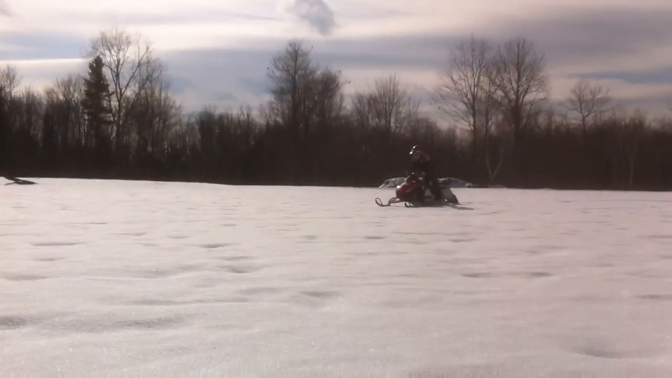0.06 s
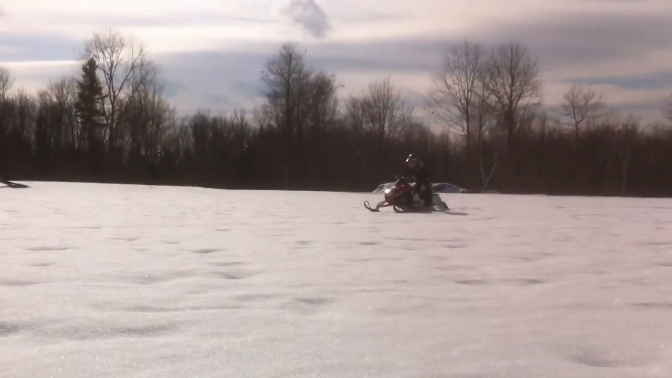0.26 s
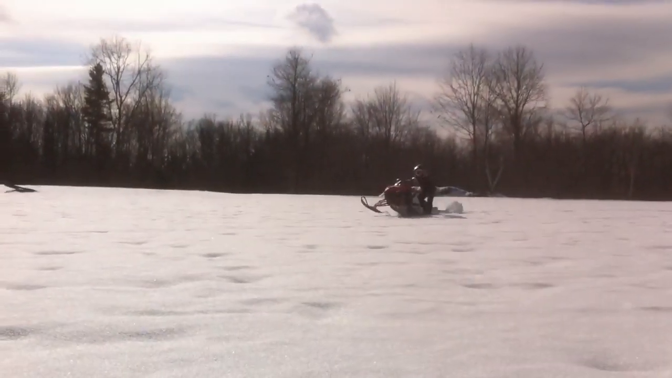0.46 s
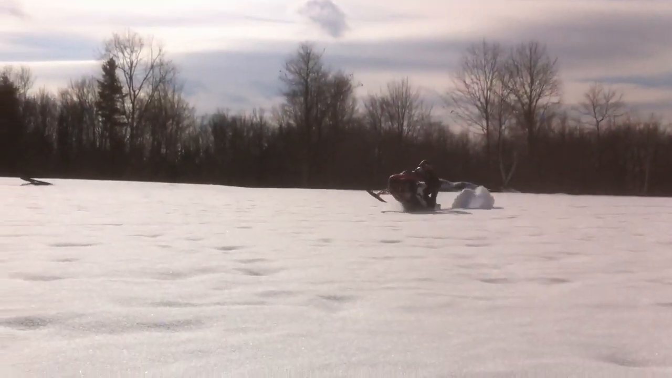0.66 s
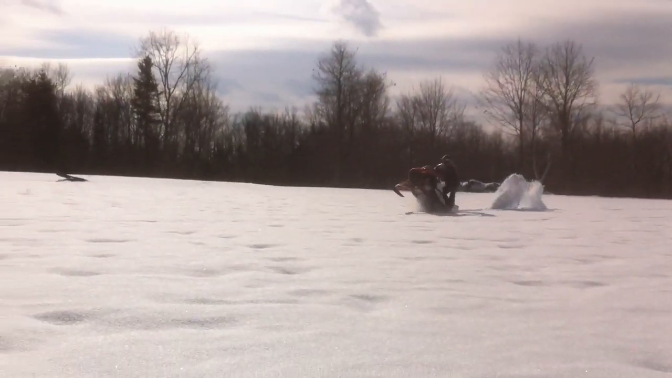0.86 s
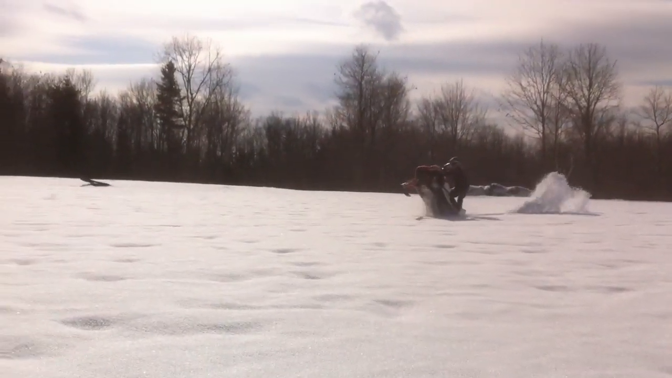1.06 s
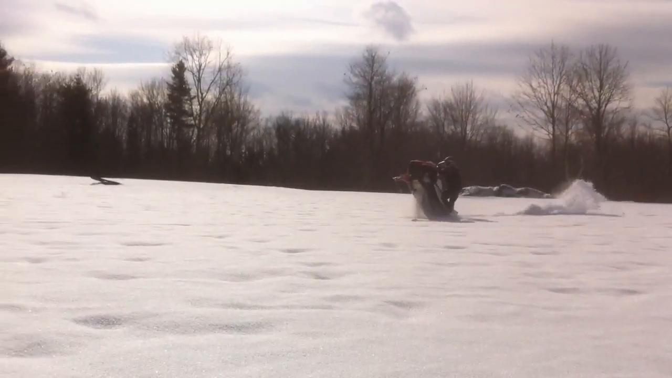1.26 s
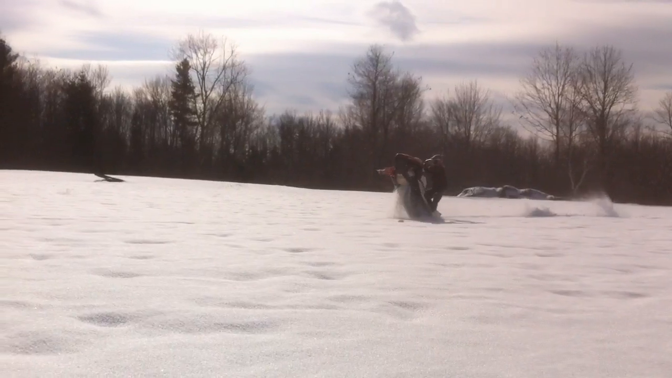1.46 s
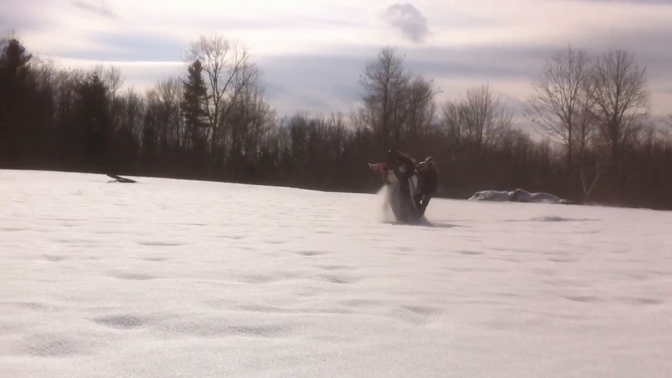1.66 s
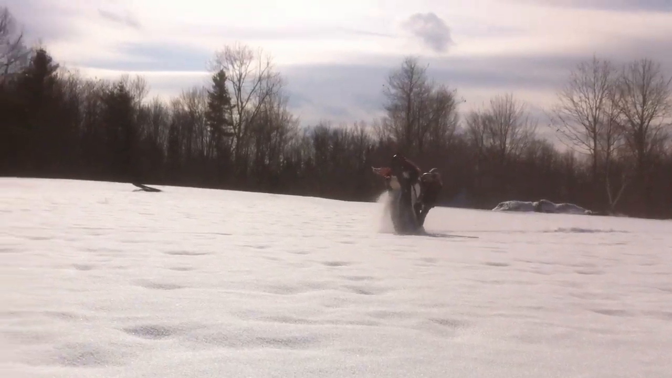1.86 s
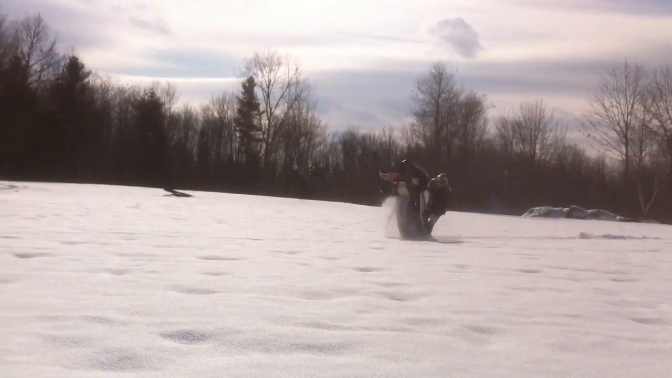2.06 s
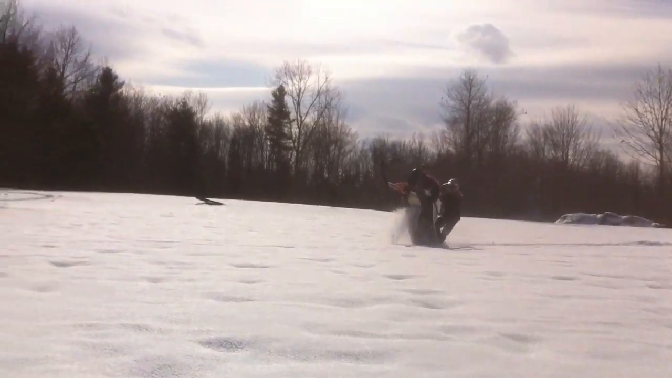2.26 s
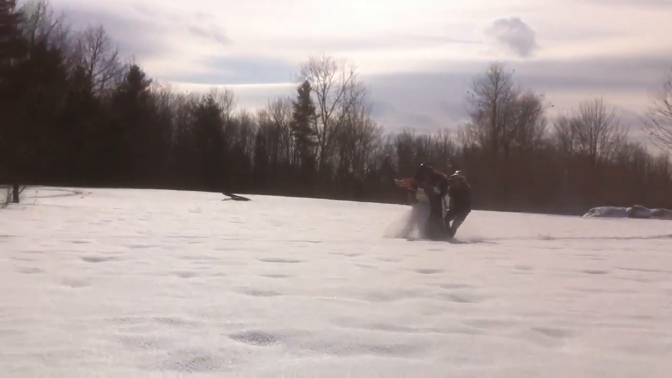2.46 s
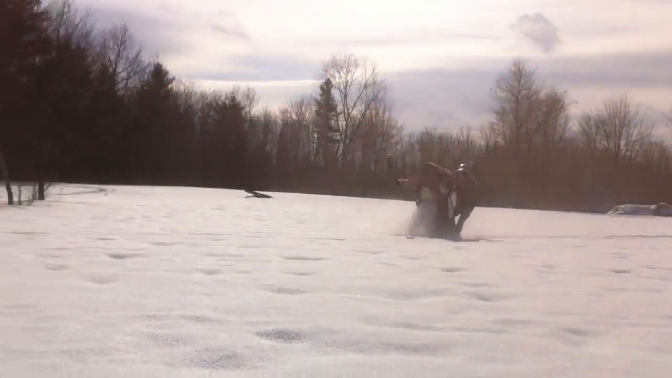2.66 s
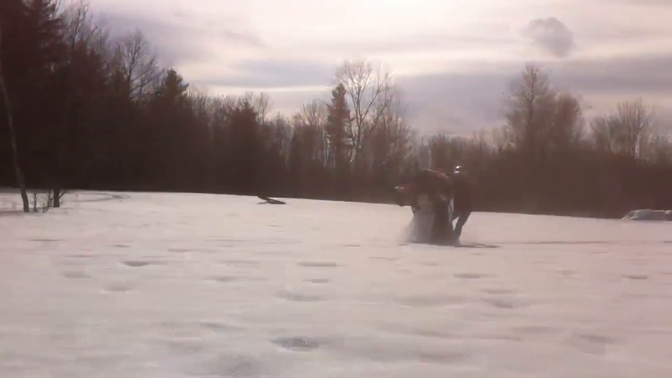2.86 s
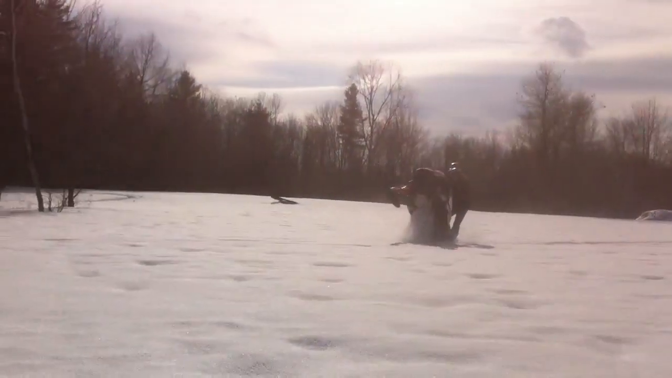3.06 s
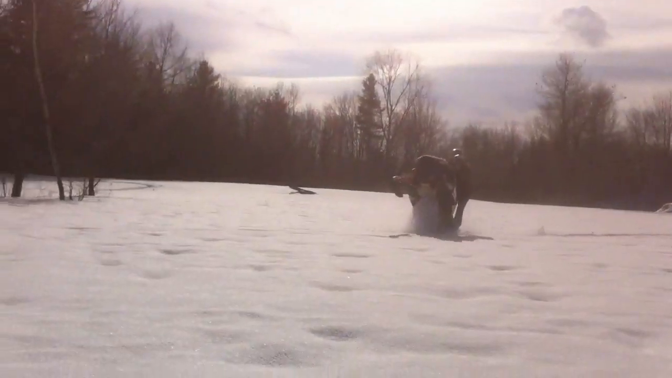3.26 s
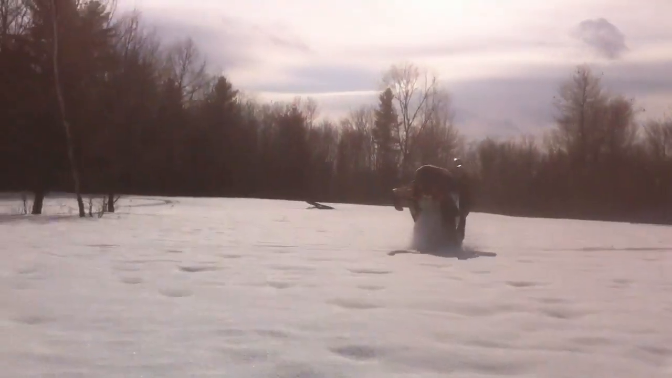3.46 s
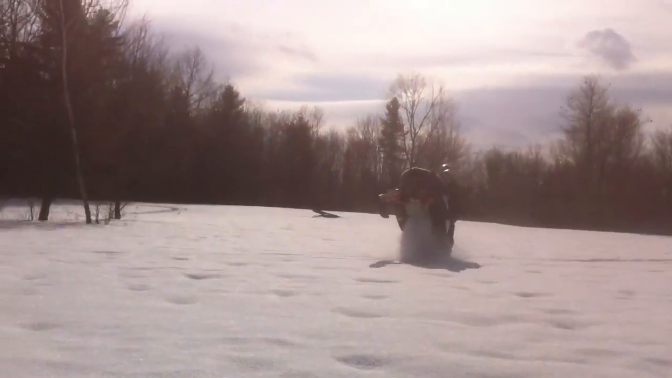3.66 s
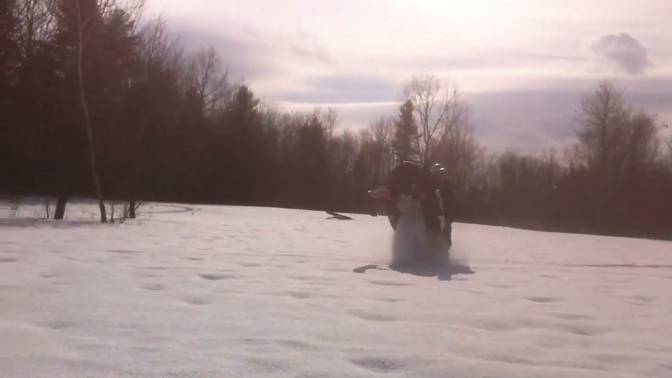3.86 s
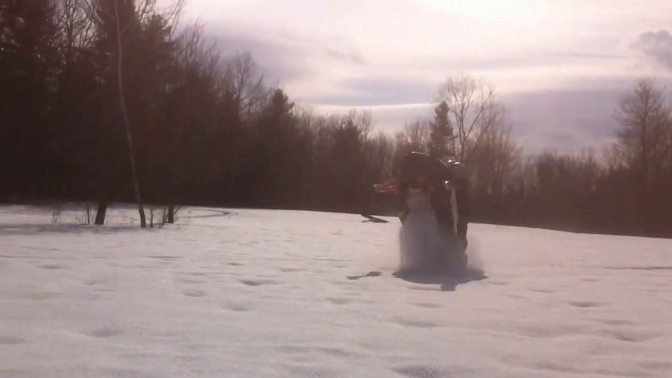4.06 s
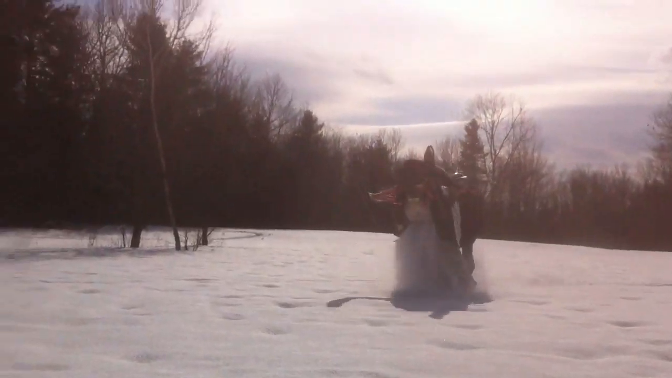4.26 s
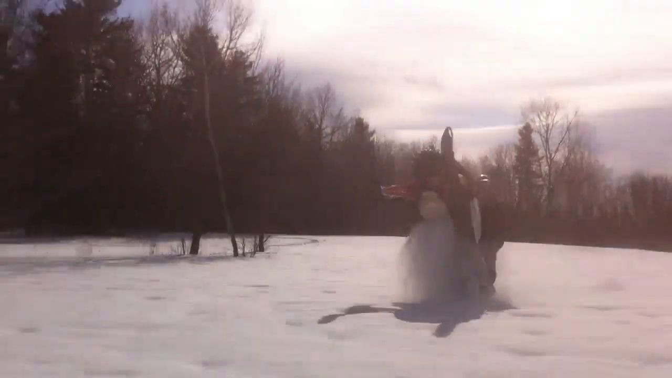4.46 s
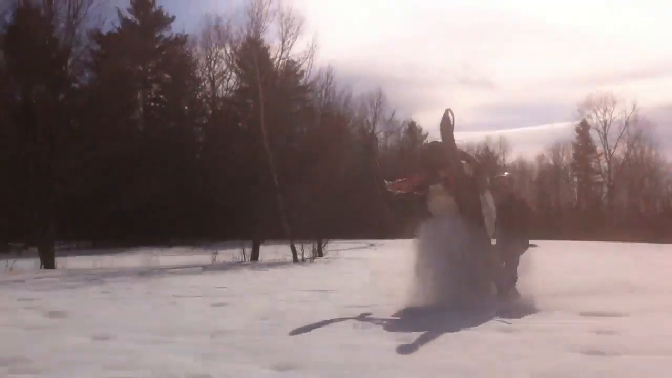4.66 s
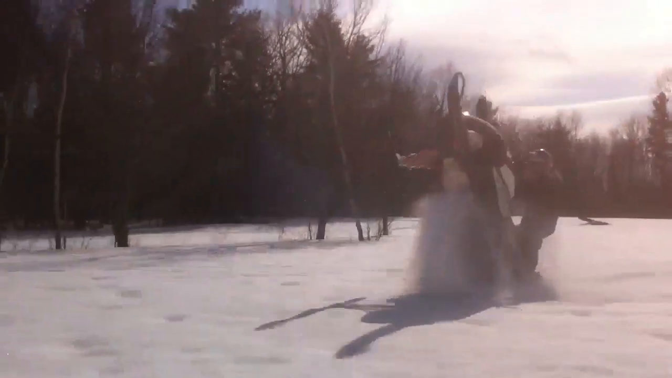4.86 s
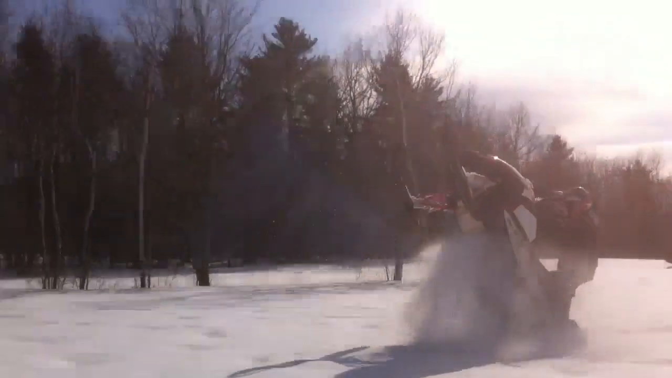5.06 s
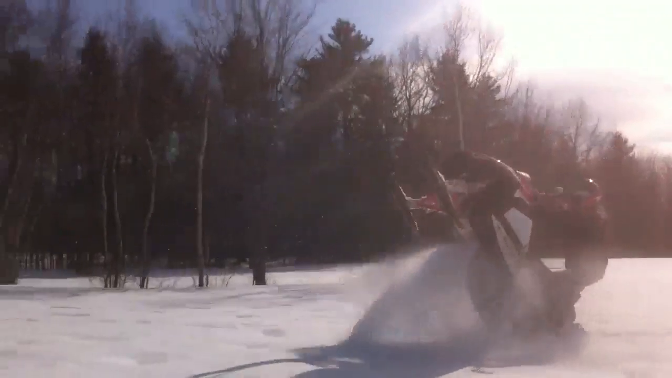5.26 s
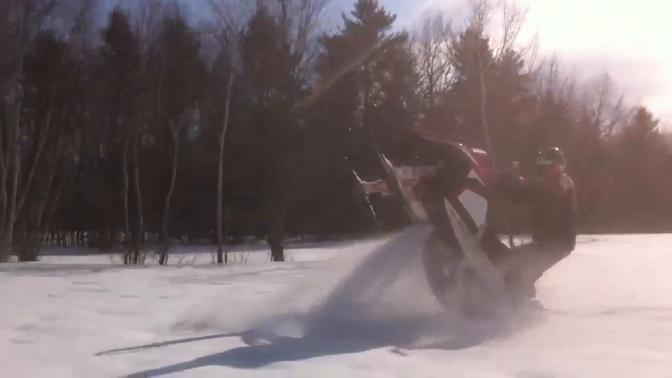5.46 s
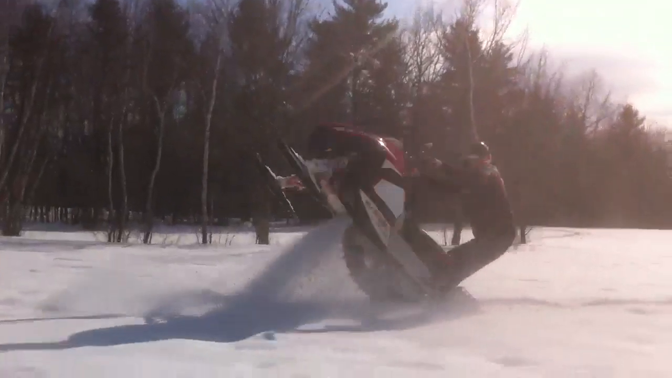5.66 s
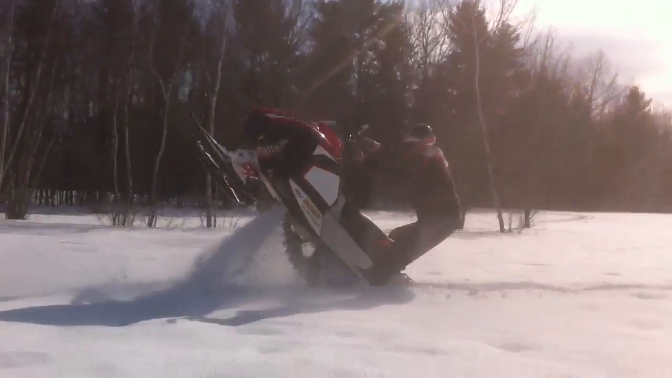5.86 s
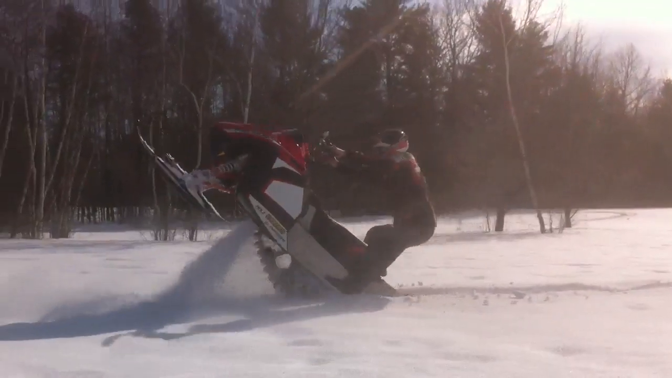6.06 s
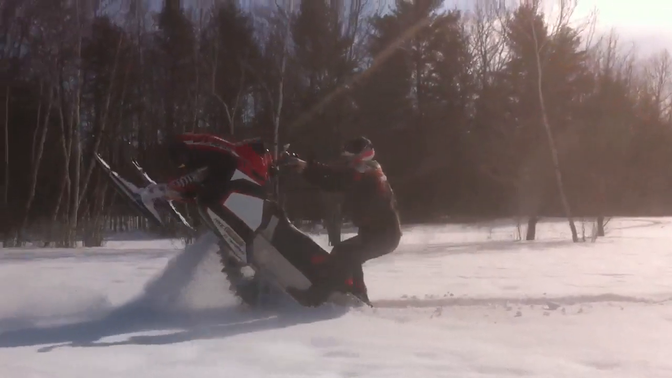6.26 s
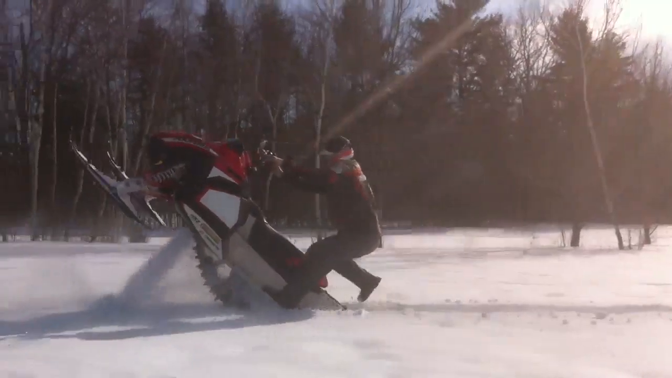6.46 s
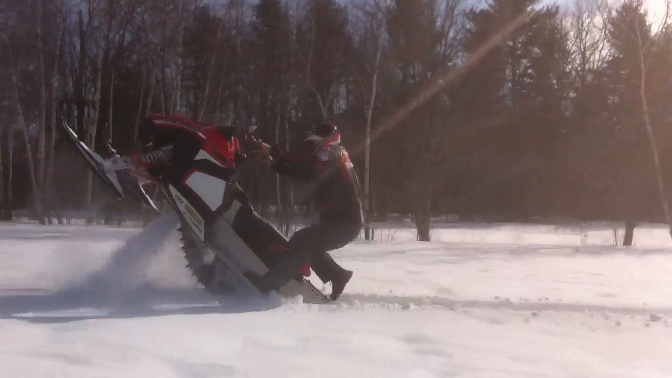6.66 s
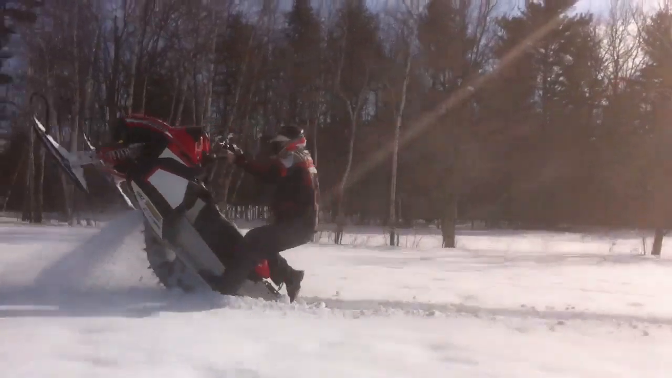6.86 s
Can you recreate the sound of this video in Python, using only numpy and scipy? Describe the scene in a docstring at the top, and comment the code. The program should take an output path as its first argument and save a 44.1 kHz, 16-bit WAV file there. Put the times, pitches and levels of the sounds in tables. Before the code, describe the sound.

A two-stroke snowmobile revs up from idle some way off in an open snowy field, its exhaust buzzing and rasping. The track churns, hisses through snow and gives a few dull thumps. The revs sag briefly, then hold high and steady as it approaches. A throbbing track hum joins before it passes close to the microphone with a slight dip and stays loud, with a faint echo from the trees.

```python
"""A two-stroke snowmobile pulls away from idle over a snowy field, its pipe rasping at every firing.
The track churns and sprays snow and thumps on the crust. Near 2 s the rider lets off briefly.
From 4 s the sled rears up and the hum of the track lugs beats against the exhaust note.
At 5 s it passes close, the revs dipping briefly, its colour turning from ahead to abreast to behind.
The forest edge answers faintly throughout. Mono."""
import sys
import numpy as np
from scipy import signal
from scipy.fft import rfft, irfft, next_fast_len
from scipy.io import wavfile
from scipy.ndimage import uniform_filter1d, map_coordinates

SR = 44100
rng = np.random.default_rng(int(sys.argv[2]) if len(sys.argv) > 2 else 0)


def transcribe(u):
    """Save the signal u as a 16-bit wav file named by the first command-line argument.

    u: samples, shape (n,) or (channels, n), limited to [-1, 1]; the rate is SR.
    q: integer samples, one column per channel.
    """
    v = np.clip(np.atleast_2d(u).T, -1, 1)
    q = np.round(v * 32767).astype(np.int16)
    wavfile.write(sys.argv[1], SR, q)


N = 304731
LAUNCH_S, POWER_RISE_S = 0.13, 0.38


def amp(db):
    """Decibels to gain."""
    return 10 ** (np.asarray(db) / 20)


def unit(x):
    """Scale to rms 1."""
    return x / np.sqrt(np.mean(x ** 2) + 1e-20)


def along(points, hz):
    """Interpolate (freq_hz, value) points on a log axis."""
    freq_hz, values = np.transpose(points)
    return np.interp(np.log(hz + 1), np.log(freq_hz + 1), values)


def curves(rows):
    """One value per sample for each column after time_s."""
    time_s, *columns = np.transpose(rows)
    return [np.interp(np.arange(N) / SR, time_s, column) for column in columns]


def ramp(start_s, length_s):
    """Smooth step from 0 to 1."""
    u = np.clip((np.arange(N) / SR - start_s) / length_s, 0, 1)
    return u * u * (3 - 2 * u)


def wobble(rate_hz):
    """Smooth random curve, rms about 1."""
    knots = rng.standard_normal(int(N * rate_hz / SR) + 4)
    coarse = np.arange(0, N + 32, 32)
    return np.interp(np.arange(N), coarse, map_coordinates(knots, [coarse * rate_hz / SR]))


def filtered(x, response):
    """Apply a gain given as a function of Hz."""
    size = next_fast_len(N + SR // 2)
    return irfft(rfft(x, size) * response(np.fft.rfftfreq(size, 1 / SR)), size)[:N]


def rush(spectrum, gate, patchy_db):
    """Gated, coloured noise with patches of random gain, rms 1."""
    bins = signal.stft(rng.standard_normal(N), nperseg=512)[2]
    patches = uniform_filter1d(rng.standard_normal(bins.shape), size=4, axis=0)
    patches = uniform_filter1d(patches, size=14, axis=1)
    noise = signal.istft(bins * amp(patchy_db * unit(patches)), nperseg=512)[1][:N]
    return unit(filtered(noise * gate, lambda hz: amp(along(spectrum, hz))))


def crossfade(a, b, share):
    """Equal-power blend from a to b."""
    return np.sqrt(1 - share) * a + np.sqrt(share) * b


def passing_rush(ahead, past, facing, gate, patchy_db):
    """Noise whose colour changes as the sled comes abreast."""
    return crossfade(rush(ahead, gate, patchy_db), rush(past, gate, patchy_db), np.clip(facing, 0, 1))


def seen_from(facing, ahead, abreast, behind):
    """Blend three values at facing 0, 1 and 2."""
    return ahead + np.clip(facing, 0, 1) * (abreast - ahead) + np.clip(facing - 1, 0, 1) * (behind - abreast)


def drive(idle_hz=75.3, idle_db=-13, spin_up_s=0.5, shut_s=0.066):
    """Revs and throttle: on a lift the power drops at once, the revs sag, both recover together."""
    # speed the clutch holds at full throttle: time_s, crank_hz
    held = [(.7, 137.9), (1.08, 141.4), (2.4, 141.8), (2.7, 140.8), (3.8, 143.4), (4.05, 142.5),
            (4.35, 144.7), (4.7, 141), (5.5, 141.2), (6.08, 138.8), (6.5, 140.6)]
    # rider eases off: start_s, fall_s, recover_s, drop_hz, throttle_drop_db
    lifts = [(1.32, .13, .2, 8.3, 3), (1.5, .2, 0.3023, 2.05, 1.5), (1.83, .155, .325, 31.5, 8),
             (4.53, 0.09, 0.18, 5, 2), (4.899, .13, 0.32, 7.8, 3.5)]
    held_hz, = curves(held)
    crank_hz = idle_hz + (held_hz - idle_hz) * ramp(LAUNCH_S, spin_up_s)
    throttle_db = idle_db * (1 - ramp(LAUNCH_S, POWER_RISE_S))
    for start_s, fall_s, recover_s, drop_hz, drop_db in lifts:
        eased = 1 - ramp(start_s + fall_s, recover_s)
        crank_hz -= drop_hz * ramp(start_s, fall_s) * eased
        throttle_db -= drop_db * ramp(start_s, shut_s) * eased
    return crank_hz, throttle_db


def voice_levels(facing, loudness_db, throttle_db):
    """Each voice's dB follows side, overall loudness and throttle; at idle the firing note stands out."""
    # by voice: ahead_db, abreast_db, behind_db, idle_extra_db, loudness_db_per_db, throttle_db_per_db
    voices = {"note": (-24.5, -29, -27, 19, 2.5, 1), "octave": (-22.5, -14.5, -39, -17.5, 2.17, 0.38),
              "twelfth": (-25, -27.5, -36.5, 2.5, 1.7, 1.5),
              "other orders": (-20, -22.5, -22.5, -2.5, 1.57, 1.5),
              "churn": (-27, -25.5, -27, -1.5, 1.72, 0.5), "rasp": (-18.5, -22.5, -25, 1, 1.32, 1),
              "hiss": (-29, -29, -26.5, 0.5, 0.79, 1.39)}
    idling = 1 - ramp(LAUNCH_S, POWER_RISE_S)
    return {name: seen_from(facing, *views_db) + idle_db * idling + slope * loudness_db + load * throttle_db
            for name, (*views_db, idle_db, slope, load) in voices.items()}


def crank(crank_hz, jitter_rad=0.021, drift_rad=0.019):
    """Crank angle; no two firings take quite the same time."""
    return 2 * np.pi * np.cumsum(crank_hz) / SR + jitter_rad * wobble(140) + drift_rad * wobble(22)


def silencer(hz, centre_hz=850, half_width_hz=60, boost=0.19):
    """Gain of the resonance that the orders sweep through."""
    return 1 + boost / (1 + ((hz - centre_hz) / half_width_hz) ** 2)


def exhaust(crank_rad, crank_hz, facing, far, levels_db, fade_db=1.4, far_fade_db=3, orders=26):
    """Two firings a turn give strong even orders; unequal cylinders add the odd ones."""
    # colour of the even and odd orders: freq_hz, ahead_db, abreast_db, behind_db
    even = [(555, -20, -10, -10), (775, -4.5, 33, -7), (1164, -16.5, -20.5, -6), (1380, -2, 0.5, -40),
            (1800, -4, -5.5, -6), (1830, -6.5, -3.5, -14), (2430, -14, -22, -37), (2340, -9, -22, 5),
            (2640, -14.5, -9, -26), (3030, -14, -14, -32), (3350, -25, -27, -19), (3540, -20.5, -21, -15.5)]
    odd = [(140, -24.5, -17, -14), (400, -25, -8.5, -10), (714, -18, -15.5, -14), (1040, -49, -10, -13.5),
           (1200, -17, -7, -34), (1570, -13.5, -15, -29), (1930, -8.5, -26, -14), (2090, -8.5, -8, -10.5),
           (2420, -33.5, -20, -27), (2700, -12, -6.5, -31), (3060, -27.5, -31, -26)]
    # single orders that swell and fade: centre_s, order, half_width_s, level_db
    whines = [(0.25, 10, .029, -42), (0.364, 8, 0.04, -37), (0.462, 4, 0.045, -41), (.6, 2, 0.31, -37.5),
              (1.4, 4, .4, -37.5), (1.53, 18, 0.07, -25.5), (1.52, 19, 0.069, -32), (1.75, 6, 0.11, -29),
              (2.08, 8, 0.073, -30), (2.135, 10, 0.061, -34), (2.38, 6, 0.18, -28), (2.42, 14, 0.25, -30),
              (3.547, 12, 0.21, -26.5), (4, 14, 0.23, -26), (4.28, 10, 0.14, -31), (3.9, 2, 0.13, -32),
              (5.16, 2, 0.13, -23), (6.047, 15, 0.13, -28), (6.861, 13, 0.19, -23.5), (6.866, 4, .1, -28)]
    loud = {2: "note", 4: "octave", 6: "twelfth"}
    # below its tuned speed the engine fires unevenly, lifting the odd orders
    uneven_db = 10 * np.clip((136 - crank_hz) / 35, 0, 1)
    t = np.arange(N) / SR
    sound = np.zeros(N)
    for k in range(1, orders + 1):
        if k in loud:
            depth_db = fade_db + (k == 2) * far_fade_db * far  # from afar the firing note comes and goes
            gain = amp(levels_db[loud[k]] + depth_db * wobble(7) + 1.3 * wobble(60))
        else:
            freq_hz, *columns = np.transpose(odd if k % 2 else even)
            views_db = [np.interp(k * crank_hz, freq_hz, column) for column in columns]
            colour_db = seen_from(facing, *views_db) + k % 2 * uneven_db
            fading_db = 0.35 * wobble(4.1) + 1.94 * wobble(30)  # moving air, uneven snow
            gain = amp(levels_db["other orders"] + colour_db + fading_db) * silencer(k * crank_hz)
        for centre_s, order, half_width_s, level_db in whines:
            if order == k:
                gain = np.hypot(gain, amp(level_db) * np.exp(-((t - centre_s) / half_width_s) ** 2))
        # low even orders line up into one suction pulse; the changing path scatters the rest
        scatter_rad = 0.02 * k if k % 2 == 0 and k <= 12 else 0.6 + 0.09 * k
        sound -= np.sqrt(2) * gain * np.cos(k * crank_rad - scatter_rad * wobble(1.606))
    return sound


def puffs(crank_rad, depth_db):
    """Gain pulsing twice a turn; a negative depth dips at each firing."""
    return amp(depth_db * np.cos(2 * crank_rad) + 0.24 * np.cos(crank_rad))


def churn(crank_rad, facing, level_db):
    """The track churns snow: a low rush pulsing at the firing rate."""
    # spectra ahead and once abreast: freq_hz, density_db
    ahead = [(25, -43), (60, -29), (100, -23), (150, -7.5), (220, -7), (340, -8.5), (480, -4.5),
             (650, -4.5), (820, 0.5), (1000, -1), (1200, 1), (2000, -72)]
    past = [(25, -43), (60, -40), (100, -21.5), (150, -11), (220, -9), (340, -13.5), (490, -7),
            (650, -10.5), (820, -1.5), (1000, -8), (1200, -33), (2000, -60)]
    return amp(level_db) * passing_rush(ahead, past, facing, puffs(crank_rad, depth_db=-9.5), patchy_db=1.5)


def rasp(crank_rad, facing, far, level_db):
    """Gas rasps out of the pipe at each firing; from afar the snow soaks up its middle."""
    # spectra ahead, once abreast and from afar: freq_hz, density_db
    ahead = [(600, -53), (900, -38), (1100, -6.5), (1350, 1.5), (1900, 0.5), (2350, 0.5), (2800, 3.5),
             (3200, -5.5), (3650, -7.5), (4100, -25.5), (4700, -45), (7000, -70)]
    past = [(600, -50), (900, -20), (1100, -2), (1330, 4), (1700, -3.5), (2080, 1.5), (2350, -1.5),
            (2700, -2), (3200, -9), (3700, -7), (4300, -6.5), (7000, -60)]
    afar = [(600, -52), (900, -18), (1100, -2), (1400, -18), (1800, -7), (2150, 5), (2750, 0), (3150, -0.5),
            (3600, -5.5), (4100, -21), (4700, -24), (7000, -70)]
    gas = puffs(crank_rad, depth_db=0.5)
    near_rasp = passing_rush(ahead, past, facing, gas, patchy_db=1.97)
    far_rasp = rush(afar, gas, patchy_db=3.3)
    return amp(level_db + 0.53 * wobble(28)) * crossfade(near_rasp, far_rasp, far)


def spray(crank_rad, facing, level_db):
    """Snow thrown by the track hisses."""
    # spectra ahead and once abreast: freq_hz, density_db
    ahead = [(3000, -28), (4100, -5), (4700, -11.5), (5400, -3), (6300, -1), (7700, 3.5), (9000, -1),
             (10200, -7.5), (10900, -15.5), (11800, -7), (13500, -10), (16000, -13)]
    past = [(3000, -17), (4100, -6.5), (4700, 3.5), (5400, 2.5), (6300, 0.5), (7700, 1), (9000, 0),
            (11000, -1), (12000, -1.5), (13500, -6), (16000, -11.5)]
    gain = amp(level_db + 0.093 * wobble(15))
    return gain * passing_rush(ahead, past, facing, puffs(crank_rad, depth_db=0.3), patchy_db=1.75)


def snow_bounce(x):
    """A second path off the snow lengthens as the sled closes in; its notches sweep downward."""
    # reflection: time_s, delay_ms, strength
    bounce = [(1, 0.018, 0.11), (2.5, 0.086, 0.18), (3.4, 0.11, 0), (4.25, 0.15, 0.15), (4.92, 0.18, 0.49),
              (5, 0.15, 0.6), (5.13, 0.32, 0.02), (5.4, .5, 0)]
    delay_ms, strength = curves(bounce)
    late = map_coordinates(x, [np.arange(N) - delay_ms * SR / 1000])
    return (x + strength * late) / np.hypot(1, strength)


def thumps(half_width_s=0.026, lag_s=0.008, trim_db=-1):
    """Dull, short pushes of the track into crusted snow."""
    # pushes: time_s, level_db
    pushes = [(0.218, -38), (0.805, -44), (1.03, -48), (1.137, -40), (2.117, -32), (2.509, -41),
              (2.759, -41), (2.899, -40)]
    spectrum = [(30, -37), (90, 5), (150, 19), (210, 1), (400, -44), (1500, -90)]  # freq_hz, density_db
    t = np.arange(N) / SR
    swell = sum(amp(level_db + trim_db) * np.exp(-((t - time_s - lag_s) / half_width_s) ** 2)
                for time_s, level_db in pushes)
    return swell * rush(spectrum, gate=1, patchy_db=1.5)


def lug_hum(crank_hz, facing):
    """The track lugs, geared to the crank, hum near the firing note and beat against it."""
    # shifting belt drive: time_s, lugs_per_turn
    gearing = [(.6, 1.4), (.9, 1.68), (1.9, 1.87), (2.3, 1.7), (3.45, 1.99), (3.92, 2.09), (4.15, 2.05),
               (4.42, 2.21), (4.98, 2.13), (5.12, 2.03), (5.75, 1.955), (6.2, 1.85), (6.6, 1.915)]
    # hum, loud once the sled rears up: time_s, level_db
    hum = [(0, -60), (.6, -48.5), (1.3, -60), (2.05, -47), (3.42, -57), (3.62, -48), (3.92, -31),
           (4.15, -30), (4.45, -23), (4.9, -23), (5.15, -43), (5.5, -28.5), (5.75, -31), (6.91, -37)]
    lugs_per_turn, = curves(gearing)
    level_db, = curves(hum)
    lug_rad = 2 * np.pi * np.cumsum(crank_hz * lugs_per_turn) / SR + 0.07 * wobble(40)
    octave_db = -14 + 9 * np.clip(facing, 0, 1)  # the track's open side lets out a brighter slap
    partials = [(0.5, -21), (1.5, -17), (2, octave_db)]  # alternate lug rows differ, adding half orders
    colour = sum(amp(db + 2.5 * wobble(12)) * np.cos(order * lug_rad) for order, db in partials)
    fundamental = amp(0.42 * wobble(14)) * np.cos(lug_rad)
    return amp(level_db) * np.sqrt(2) * (fundamental + colour)


def forest(x, delay_s=0.16):
    """A late, diffuse answer from the trees; the middle dies first."""
    # echo decay: freq_hz, t60_s
    decay = [(150, 0.54), (1500, 0.17), (8000, 0.67)]
    hz, t, bins = signal.stft(rng.standard_normal(SR), SR, nperseg=256)
    decay_db = -60 * t / along(decay, hz)[:, None]
    tail = signal.istft(bins * amp(decay_db), SR, nperseg=256)[1]
    late = np.pad(x, (round(delay_s * SR), 0))
    return signal.fftconvolve(late, tail / np.linalg.norm(tail))[:N]


def scene(near_db=-3, far_span_db=12, echo_db=-16.5):
    """The sled and its echo, alike in both channels."""
    # side towards the listener: time_s, facing (0 ahead, 1 abreast, 2 behind)
    sides = [(4.9, 0), (5.06, 1.006), (5.75, 1.1), (6.2, 1.51), (6.45, 2)]
    # overall loudness, scaled per voice; swells until 4.6 s, dips at the pass, then stays loud:
    # time_s, loudness_db
    loudness = [(0, -12), (.8, -11), (1.2, -7.5), (1.65, -4.5), (2.35, -4), (3.4, -3), (4.2, -1.5),
                (4.6, -1), (5.2, -3), (6, -1), (6.91, .5)]
    facing, = curves(sides)
    loudness_db, = curves(loudness)
    far = np.clip((near_db - loudness_db) / far_span_db, 0, 1)
    crank_hz, throttle_db = drive()
    levels_db = voice_levels(facing, loudness_db, throttle_db)
    crank_rad = crank(crank_hz)
    engine = exhaust(crank_rad, crank_hz, facing, far, levels_db)
    noise = churn(crank_rad, facing, levels_db["churn"])
    noise += rasp(crank_rad, facing, far, levels_db["rasp"])
    noise += spray(crank_rad, facing, levels_db["hiss"])
    sled = engine + snow_bounce(noise) + lug_hum(crank_hz, facing) + thumps()
    mono = sled + amp(echo_db) * forest(sled)
    return np.array([mono, mono])


def record(dry, bass_cut_hz=45, top_hz=16100):
    """Thin the deepest bass; keep nothing above the band limit."""
    response = lambda hz: hz ** 2 / np.hypot(hz ** 2, bass_cut_hz ** 2) * (hz < top_hz)
    return np.array([filtered(channel, response) for channel in dry])


dry = scene()
out = record(dry)
transcribe(out)
```